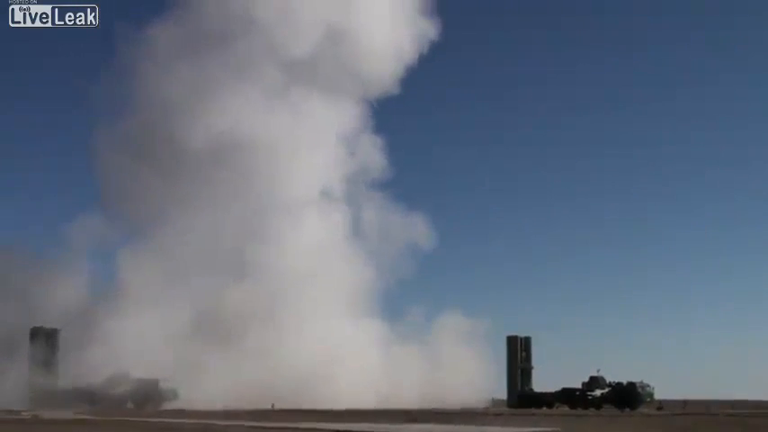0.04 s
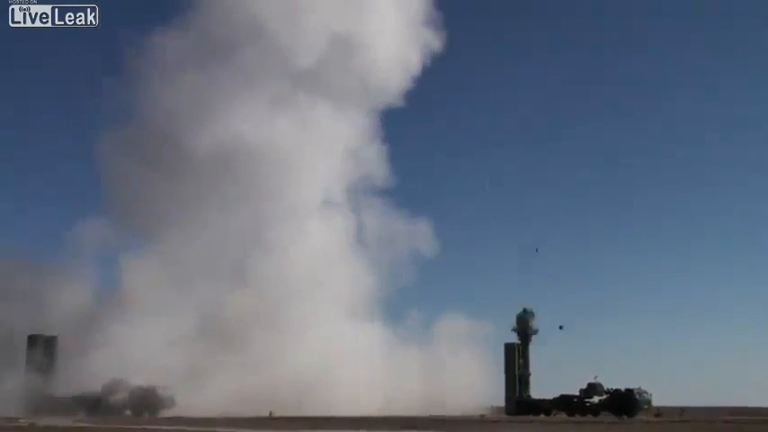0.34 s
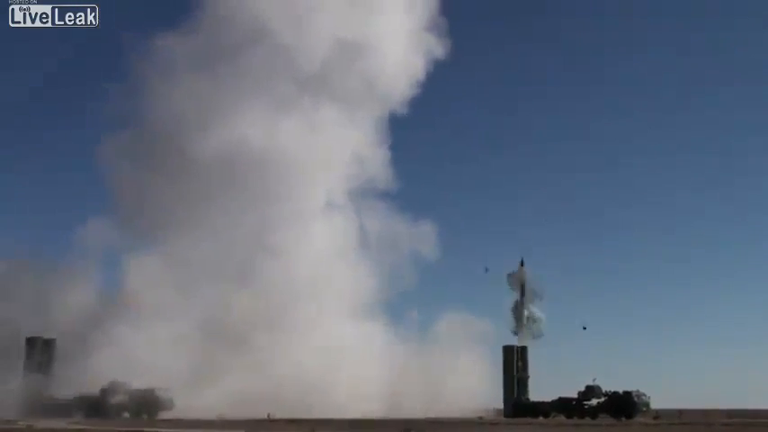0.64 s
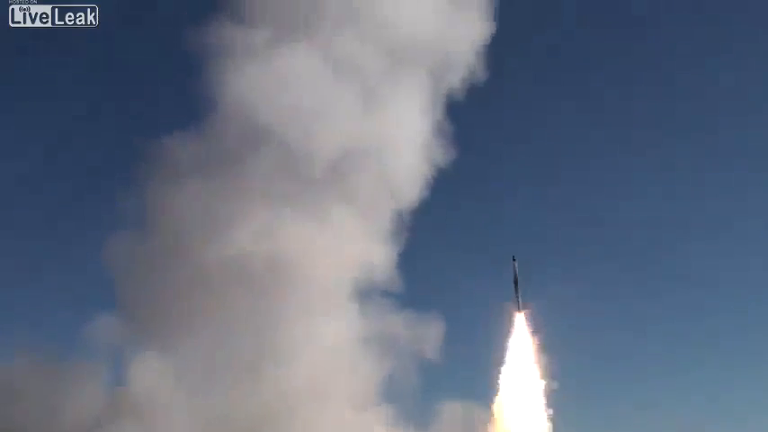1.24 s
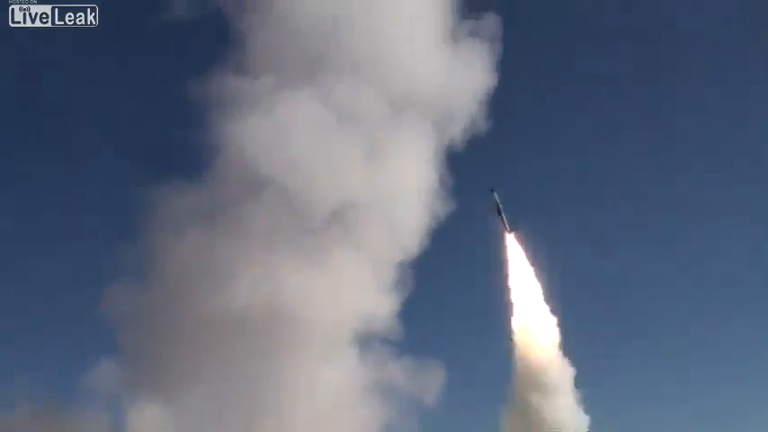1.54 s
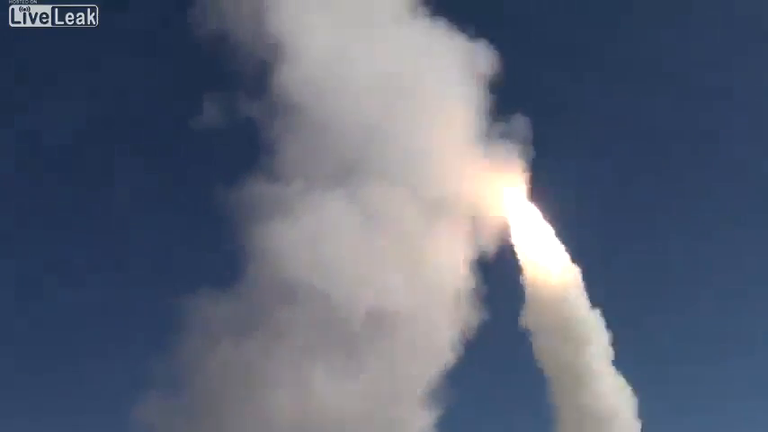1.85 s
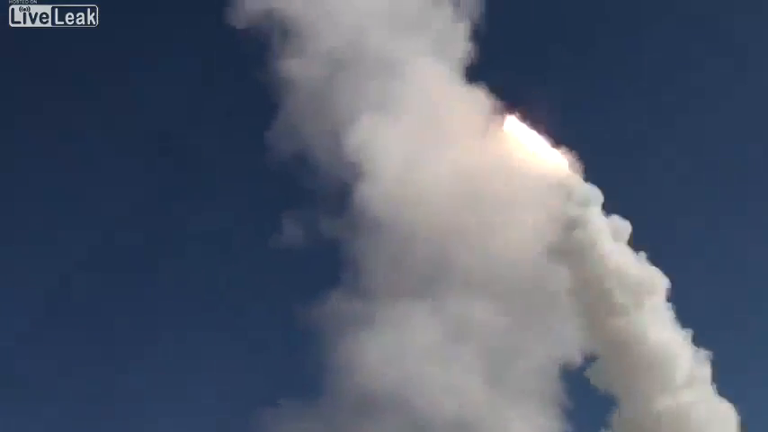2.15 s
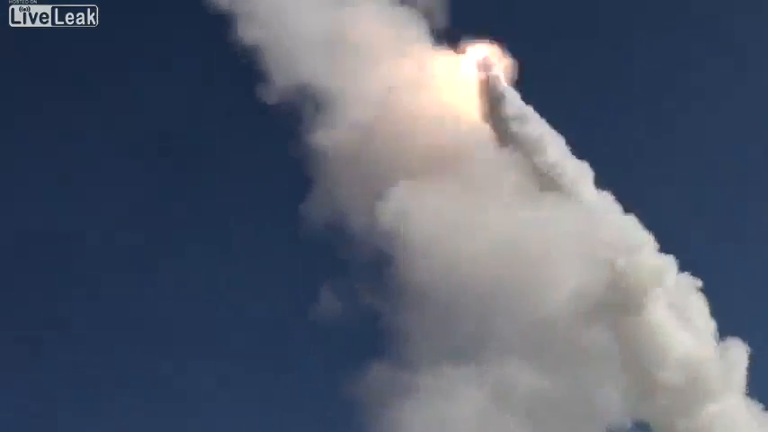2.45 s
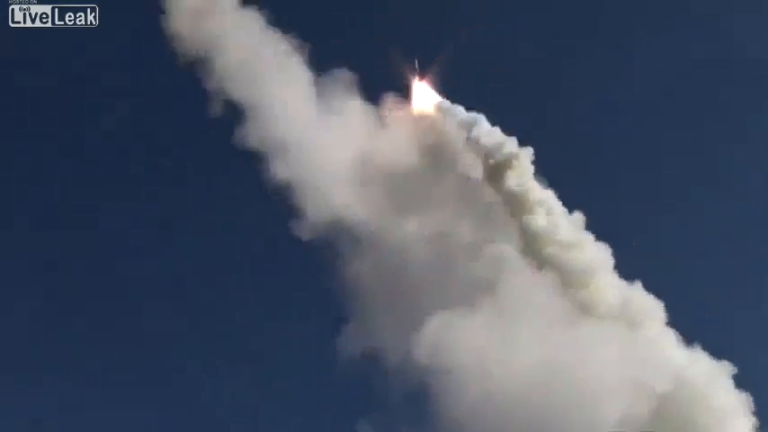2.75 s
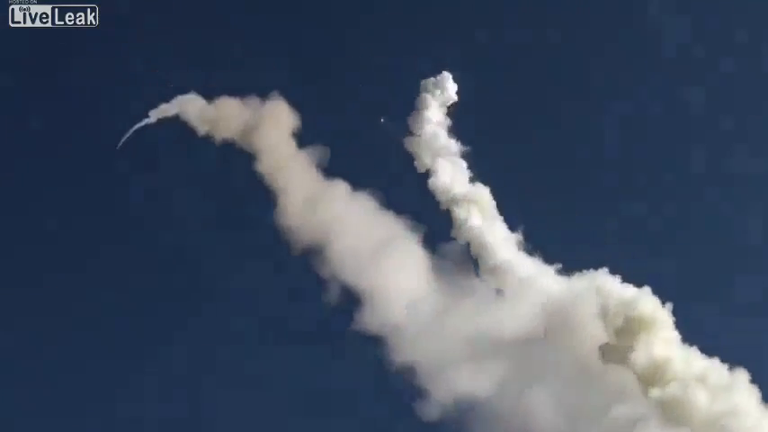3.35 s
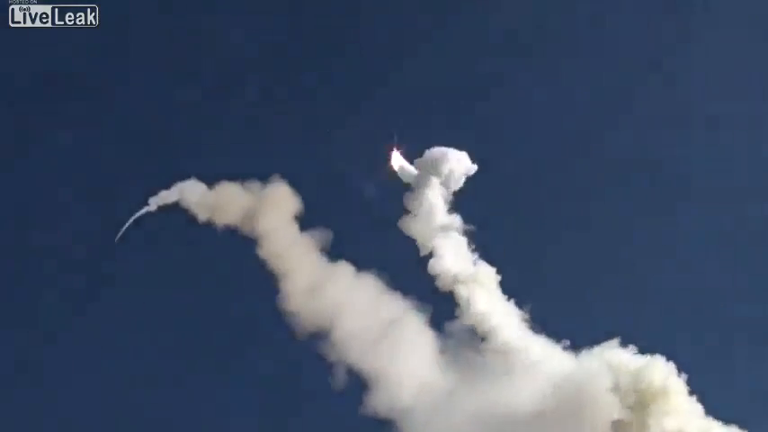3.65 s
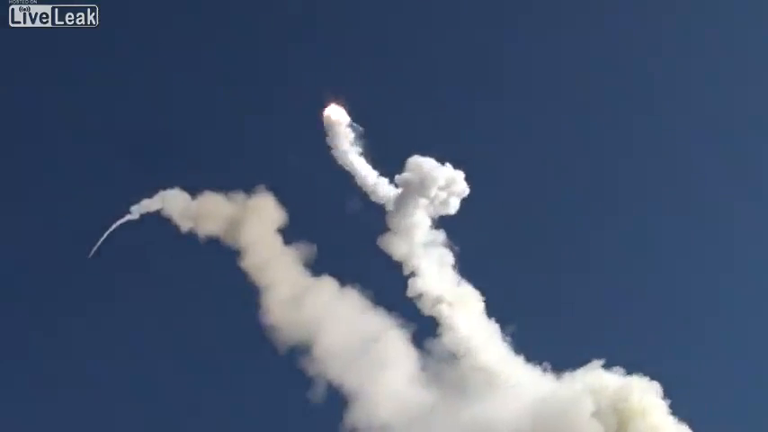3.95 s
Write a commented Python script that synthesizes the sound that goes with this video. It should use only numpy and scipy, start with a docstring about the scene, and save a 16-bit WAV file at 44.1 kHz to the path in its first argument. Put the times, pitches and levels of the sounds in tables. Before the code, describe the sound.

A missile launches on an open plain. Two quick booming blasts throw it from its tube over a distant rumble. After a short lull, the motor ignites with a loud crackling roar that grows duller and hollow as it climbs.

```python
"""An open plain: two gas blasts throw a missile out of its tube, then its motor lights and it climbs away.
The jet is a stream of small shocks in turbulent noise, with loud cracks on top. Its ground
reflection lags more as it rises, so hollow bands sweep down through the roar.
An earlier missile rumbles far off throughout."""
import sys
import numpy as np
from scipy import signal
from scipy.fft import rfft, irfft
from scipy.io import wavfile
from scipy.ndimage import uniform_filter1d

SR = 44100
rng = np.random.default_rng(int(sys.argv[2]) if len(sys.argv) > 2 else 0)


def store_pcm(level_fs):
    """Save levels as 16-bit WAV."""
    pcm = np.round(np.clip(level_fs, -1, 1) * 32767).astype(np.int16)
    wavfile.write(sys.argv[1], SR, np.atleast_2d(pcm).T)


N = 176400
T = np.arange(N) / SR


def amp(db):
    """Decibels to gain."""
    return 10 ** (np.asarray(db) / 20)


def unit(x):
    """Scale to rms 1."""
    return x / np.sqrt(np.mean(x ** 2))


def curve(rows, column=1):
    """Table column, linearly interpolated over time."""
    rows = np.array(rows)
    return np.interp(T, rows[:, 0], rows[:, column])


def wander(rate_hz):
    """Unit Gaussian values at rate_hz, linearly interpolated."""
    knots = rng.standard_normal(2048)
    return np.interp(T * rate_hz, np.arange(len(knots)), knots)


def delay(x, lag_s):
    """Fixed or moving delay."""
    return np.interp(T - lag_s, T, x)


def colour(x, spectrum, size=8192):
    """Minimum-phase filter through (freq_hz, gain_db) points."""
    hz, db = np.array(spectrum).T
    bins_hz = np.maximum(np.arange(size // 2 + 1) * SR / size, 1)
    gain = amp(np.interp(np.log(bins_hz), np.log(hz), db))
    cepstrum = irfft(np.log(gain))
    cepstrum[1:size // 2] *= 2
    cepstrum[size // 2 + 1:] = 0
    impulse = irfft(np.exp(rfft(cepstrum)))[:size // 2]
    return signal.oaconvolve(x, impulse)[:N]


def lowpass(x, hz, order=2):
    """Zero-phase low-pass."""
    return signal.sosfiltfilt(signal.butter(order, hz, fs=SR, output="sos"), x)


def narrow_noise(centre_hz, width_hz):
    """Noise band with a fixed or moving centre; rms 1."""
    noise = rng.standard_normal((2, N + SR))
    in_phase, quadrature = lowpass(noise, width_hz / 2)[:, SR // 2:SR // 2 + N]
    phase = 2 * np.pi * np.cumsum(centre_hz * np.ones(N)) / SR
    return unit(in_phase * np.cos(phase) + quadrature * np.sin(phase))


def turbulence(shocks_per_s, shock_share):
    """Random shock fronts of uneven size, in bursts, over white noise; rms 1."""
    scatter_db = 2.5 * rng.standard_normal(N)
    burst_db = 1.34 * wander(rate_hz=200)
    hits = rng.random(N) < shocks_per_s / SR
    fronts = hits * amp(scatter_db + burst_db) / np.sqrt(shocks_per_s)
    fronts = unit(fronts - uniform_filter1d(fronts, size=601))
    return -np.sqrt(shock_share) * fronts + np.sqrt(1 - shock_share) * rng.standard_normal(N)


# freq_hz, gain_db
RUMBLE_SPECTRUM = [(15, -41), (28, -1.5), (65, -23.5), (110, -4), (160, -11), (270, -12.5), (400, -22.5),
                   (750, -28), (950, -36.5), (2400, -48), (7000, -60.5), (8500, -66), (10000, -82)]
# time_s, level_db
RUMBLE_LEVEL = [(0, -43.5), (.25, -45), (.42, -43.5), (.7, -42), (1.3, -45), (1.5, -46.5)]


def far_missile():
    """Dull jet rumble of the earlier missile."""
    jet = turbulence(shocks_per_s=270, shock_share=0.084)
    return unit(colour(jet, RUMBLE_SPECTRUM)) * amp(curve(RUMBLE_LEVEL))


# pitch_hz, decay_s, level_db
METAL_MODES = [(2094, 0.026, -61), (6070, 0.02, -61)]


def metal_ping(start_s=1.108):
    """A loose metal part rings faintly after the ejection."""
    age_s = np.maximum(T - start_s, 0)
    return sum(amp(level_db) * np.exp(-age_s / decay_s) * np.sin(2 * np.pi * pitch_hz * age_s)
               for pitch_hz, decay_s, level_db in METAL_MODES)


# start_s, length_s, unfiltered_peak_db
PRESSURE_WAVES = [(.543, 0.0027, -15), (0.588, 0.0091, -19), (0.638, 0.00554, -13.5), (0.7997, 0.0025, -21),
                  (0.831, 0.0063, -12.5), (.8665, 0.0053, -28), (3.975, 0.012, -21)]


def thumps():
    """Rounded N-waves: a push, then suction."""
    waves = 0
    for start_s, length_s, peak_db in PRESSURE_WAVES:
        progress = (T - start_s) / length_s
        waves += amp(peak_db) * (1 - 2 * progress) * ((progress > 0) & (progress < 1))
    return lowpass(waves, hz=700)


# start_s, level_db
SHOCK_CLUSTERS = [(0.799, -20), (2.004, -13), (2.066, -12), (2.131, -13), (2.3265, -9), (2.348, -13),
                  (2.398, -11), (2.4335, -13), (2.644, -14), (2.7975, -8.5), (2.8065, -13), (2.853, -18),
                  (3.135, -24), (3.49, -18), (3.924, -20), (3.973, -21)]
# freq_hz, gain_db
CRACK_SPECTRUM = [(60, -28), (300, -4), (750, 3), (1500, -4.5), (3000, -16.5), (7000, -28), (10000, -50),
                  (22000, -110)]


def cracks(decay_s=0.005):
    """Tight shock clusters, each a noise burst with an instant onset."""
    envelope = sum(amp(level_db) * (T >= start_s) * np.exp(-np.abs(T - start_s) / decay_s)
                   for start_s, level_db in SHOCK_CLUSTERS)
    return envelope * unit(colour(rng.standard_normal(N), CRACK_SPECTRUM))


# Two blasts, then lesser puffs: start_s, attack_s, hold_s, decay_s, relative_db
GAS_BURSTS = [(.541, .009, .026, .022, -21), (.799, .001, .014, .025, -20.5),
              (.995, .008, .005, .011, -42.5), (.72, .035, .035, .015, -47), (1.046, .002, .003, .007, -48),
              (1.10, .008, .015, .025, -55), (1.18, .005, .003, .012, -61)]
# freq_hz, gain_db
GAS_SPECTRUM = [(18, -29), (30, -17.5), (220, -3), (341, -4), (657, -8), (760, -7), (946, -9.5),
                (1400, -10), (2760, -20), (4070, -28), (6620, -27), (7840, -30), (10000, -51.5),
                (13000, -89), (22000, -120)]
# freq_hz, gain_db
TAIL_SPECTRUM = [(18, -43), (30, -15.5), (231, -1.5), (376, -10), (901, -14), (1020, -12), (2690, -28.5),
                 (6150, -37.5), (8040, -45), (10000, -60), (13000, -95), (22000, -120)]
BURST_TRIM_DB, TAIL_TRIM_DB, ECHO_DB = 1, -7, -16.5
TAIL_RISE_S, TAIL_LOW_DECAY_S, TAIL_HIGH_DECAY_S = 0.037, 0.11, 0.077
VENT_START_S, VENT_DB = 0.96, -64.5


def gas_blasts():
    """Crackling gas bursts; the plain returns a low boom and a lumpy tail, the empty tube hisses."""
    burst, low_power, high_power = 0, 0, 0
    for start_s, attack_s, hold_s, decay_s, relative_db in GAS_BURSTS:
        age_s = np.maximum(T - start_s, 0)
        fading_s = np.maximum(age_s - attack_s - hold_s, 0)
        onset = amp(relative_db + BURST_TRIM_DB) * np.minimum(age_s / attack_s, 1)
        burst += onset * np.exp(-fading_s / decay_s)
        swell = amp(relative_db + TAIL_TRIM_DB) * np.minimum(age_s / TAIL_RISE_S, 1)
        low_power += (swell * np.exp(-fading_s / TAIL_LOW_DECAY_S)) ** 2
        high_power += (swell * np.exp(-fading_s / TAIL_HIGH_DECAY_S)) ** 2
    gas = unit(colour(turbulence(shocks_per_s=900, shock_share=0.73), GAS_SPECTRUM))
    scatter = unit(colour(rng.standard_normal(N), TAIL_SPECTRUM))
    low = lowpass(scatter, hz=670)
    lumps = amp(3.5 * wander(rate_hz=41))
    tail = lumps * (np.sqrt(low_power) * low + np.sqrt(high_power) * (scatter - low))
    vent = amp(VENT_DB) * (T > VENT_START_S)
    boom = amp(ECHO_DB) * delay(burst, lag_s=0.102) * narrow_noise(centre_hz=232, width_hz=240)
    return (burst + vent) * gas + boom + tail


# time_s, lag_ms, gain
GROUND_PATH = [(1.5, 1.1, 0), (1.9, 1.58, 0), (2.1, 2.8, 0.2), (2.4, 3.73, 0), (2.75, 4.45, 0.4),
               (3.0, 5.25, 0.27), (3.5, 6.03, 0.8), (4.0, 6.78, 0.38)]


def reflections(jet, launcher_gone_s=2.34):
    """Dull copies of the jet: the launcher's fades out, the ground's lags more with height."""
    dull = lowpass(jet, hz=1310, order=1)
    launcher_gain = 0.17 * np.clip(2 * (launcher_gone_s - T), 0, 1)
    launcher = launcher_gain * delay(dull, lag_s=0.00571)
    ground = curve(GROUND_PATH, column=2) * delay(dull, lag_s=curve(GROUND_PATH) / 1000)
    return launcher + ground


# time_s, first_band_db, second_band_db
HOLLOW_LEVEL = [(1.95, -45, -50), (2.15, -27, -45), (2.4, -20, -42), (2.6, -18.5, -40), (2.72, -27, -38),
                (2.9, -28, -28), (3.1, -32, -34), (3.45, -42, -26), (3.9, -42, -28.5)]


def hollow_bands():
    """Two sinking noise bands where jet and ground reflection are in phase."""
    spacing_hz = 1000 / curve(GROUND_PATH)
    first = narrow_noise(spacing_hz, width_hz=105) * amp(curve(HOLLOW_LEVEL, column=1))
    second = narrow_noise(2 * spacing_hz, width_hz=75) * amp(curve(HOLLOW_LEVEL, column=2))
    return first + second


# freq_hz, gain_db
JET_SPECTRUM = [(15, -45), (25, -10.5), (53, -14), (97, -2.5), (131, -4), (181, -1.5), (307, -0.5),
                (414, -3), (701, -2.5), (2010, -13), (2460, -15), (7220, -26.5), (8600, -34), (10000, -50),
                (13000, -78.5), (22000, -120)]
# time_s, shocks_per_s
JET_SHOCK_RATE = [(1.5, 1460), (2.6, 1200), (2.85, 1200), (4.0, 1360)]
# Before trim: time_s, bass_db, low_mid_db, mid_db, treble_db
JET_BAND_LEVEL = [(1.55, -13.5, -19, -19, -26.5), (1.56, -18, -19.5, -16.5, -26),
                  (1.87, -21, -17.5, -15.5, -25.5), (2.1, -18.5, -21.5, -18, -28),
                  (2.19, -19, -20, -17.5, -27), (2.54, -24.5, -18.5, -18, -29),
                  (2.6, -17, -20.5, -17, -29.5), (2.73, -27.5, -18.5, -20, -29.5),
                  (2.75, -18.5, -21.5, -18.5, -30.5), (2.81, -24, -19.5, -20.5, -30),
                  (2.85, -21, -26.5, -25, -38), (2.91, -26, -17, -23, -35.5),
                  (2.98, -20.5, -28, -25.5, -42), (3.07, -24.5, -22.5, -29.5, -41),
                  (3.13, -22, -41, -25.5, -42.5), (3.19, -32.5, -24.5, -31.5, -45),
                  (3.27, -25, -28.5, -31.5, -46.5), (3.34, -28, -25, -24.5, -36),
                  (3.36, -27, -24, -23, -34), (3.4, -26, -23.5, -25, -35.5), (3.59, -27, -24, -21, -35.5),
                  (3.61, -25, -27, -24.5, -37), (3.67, -31.5, -22.5, -23.5, -36.5),
                  (3.8, -28.5, -23, -23.5, -39.5), (3.89, -23.5, -26, -30.5, -48.5),
                  (3.92, -32, -24.5, -25, -39), (3.98, -21, -22.5, -32, -49)]
IGNITION_S, IGNITION_RISE_S, IGNITION_STEP_GAIN = 1.517, 0.041, 0.26
SAWTOOTH_RAD = 0.73  # pressure builds before each shock front


def rocket():
    """Crackling jet with sputtering mids; the treble fades most as it flies off."""
    jet = colour(turbulence(curve(JET_SHOCK_RATE), shock_share=0.44), JET_SPECTRUM)
    jet = np.real(signal.hilbert(jet) * np.exp(-1j * SAWTOOTH_RAD))
    jet = jet + reflections(jet)
    below = [lowpass(jet, edge_hz, order=4) for edge_hz in (240, 600, 2500)]
    bass, low_mid, mid, treble = np.diff([np.zeros(N), *below, jet], axis=0)
    sputter = amp(2.4 * wander(rate_hz=380))
    bands = [(bass, -2), (low_mid, -0.5), (mid * sputter, -1), (treble, 0)]
    roar = sum(unit(band) * amp(trim_db + curve(JET_BAND_LEVEL, column))
               for column, (band, trim_db) in enumerate(bands, start=1))
    ignition = np.minimum(IGNITION_STEP_GAIN + (T - IGNITION_S) / IGNITION_RISE_S, 1) * (T > IGNITION_S)
    return (roar + hollow_bands()) * ignition


def spread(source, side_spectrum):
    """Mid/side stereo from two independent draws of a source."""
    return source() + np.array([[1], [-1]]) * colour(source(), side_spectrum)


# Stereo widths: freq_hz, side_to_mid_db
RUMBLE_WIDTH = [(100, -19), (400, -12.5), (4000, -9.5)]
BLAST_WIDTH = [(60, -10), (450, -7.5), (1000, -13), (2500, -16), (9000, -16)]
JET_WIDTH = [(30, -13.5), (100, -21), (500, -19), (2000, -18.5), (9000, -16)]
# time_s, left_minus_right_db
JET_BALANCE = [(1.5, -0.35), (4.0, -0.7)]


def scene():
    """Ejection, then the motor, over the distant rumble."""
    ejection = spread(gas_blasts, BLAST_WIDTH) + thumps() + metal_ping()
    balance = amp(np.array([[1], [-1]]) * curve(JET_BALANCE) / 2)
    flight = spread(rocket, JET_WIDTH) * balance
    return ejection + flight + cracks() + spread(far_missile, RUMBLE_WIDTH)


def record(dry):
    """Soft clip, then a steep low-pass."""
    ceiling, cutoff_hz = 0.85, 9900
    rounded = ceiling * np.tanh(dry / ceiling)
    return signal.sosfilt(signal.ellip(10, 0.2, 80, cutoff_hz, fs=SR, output="sos"), rounded)


dry = scene()
out = record(dry)
store_pcm(out)
```